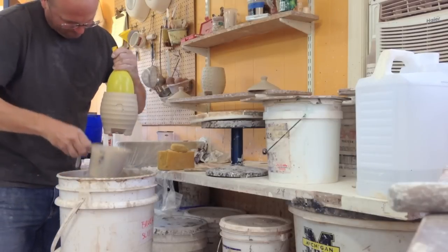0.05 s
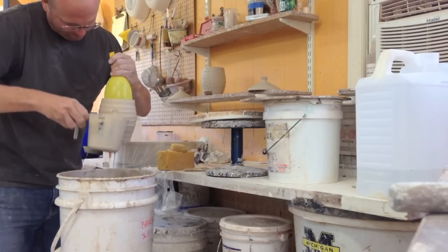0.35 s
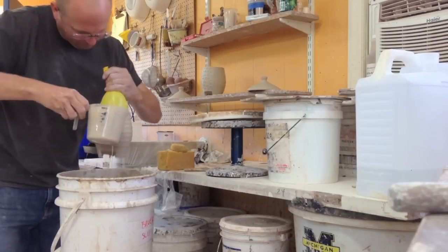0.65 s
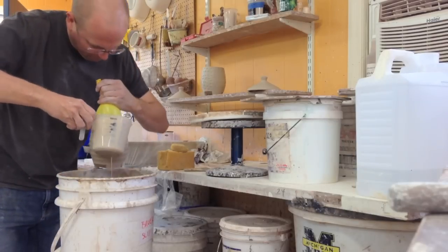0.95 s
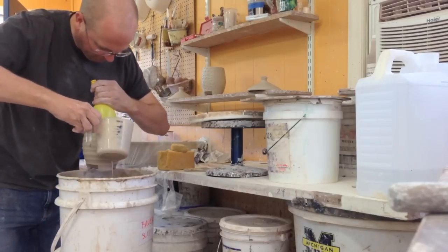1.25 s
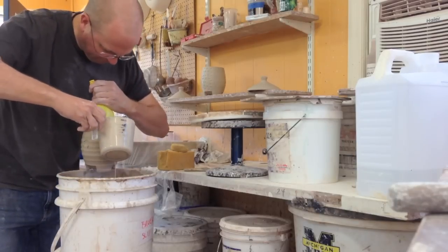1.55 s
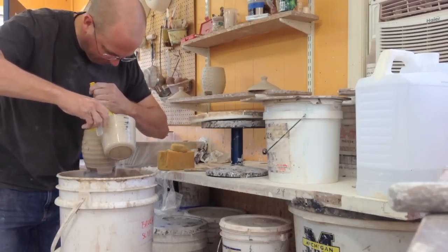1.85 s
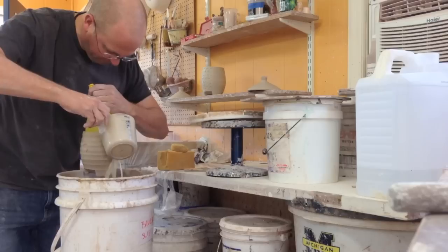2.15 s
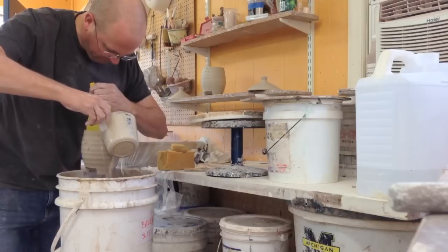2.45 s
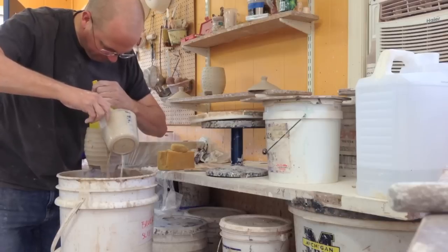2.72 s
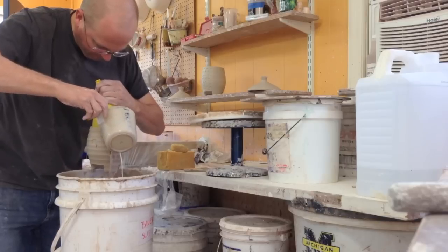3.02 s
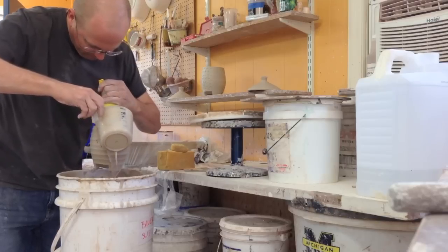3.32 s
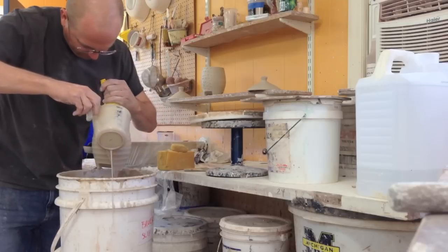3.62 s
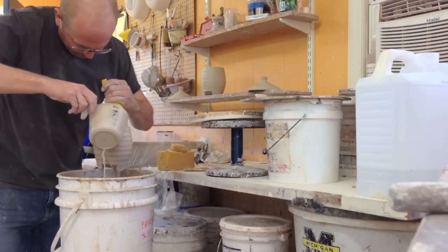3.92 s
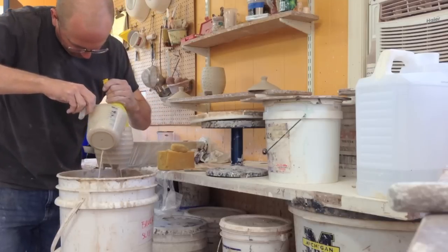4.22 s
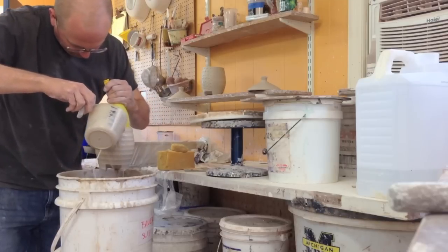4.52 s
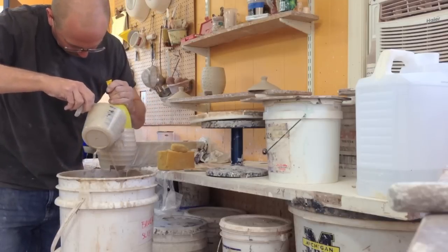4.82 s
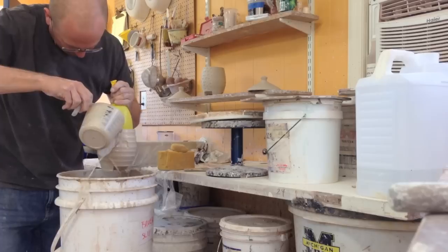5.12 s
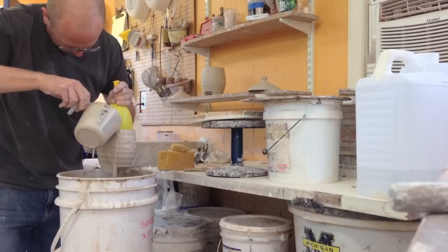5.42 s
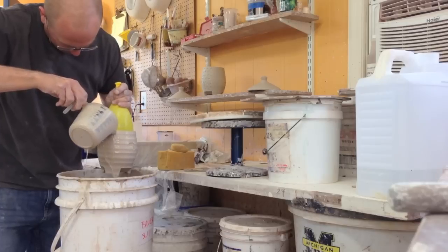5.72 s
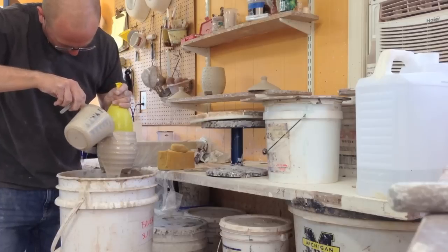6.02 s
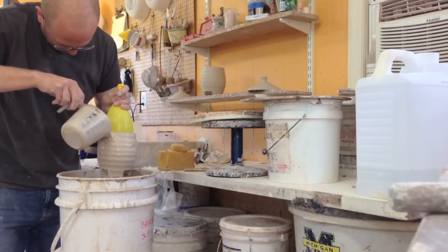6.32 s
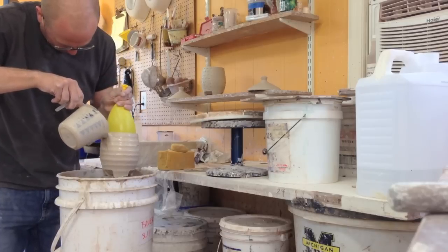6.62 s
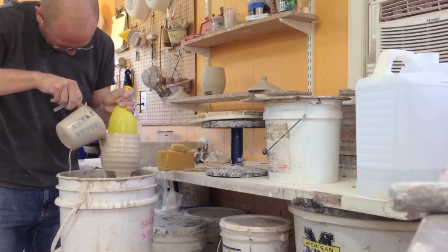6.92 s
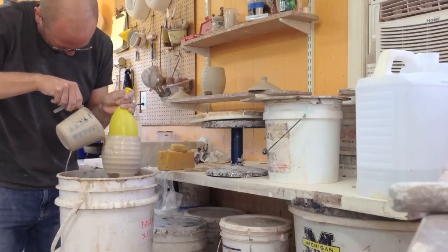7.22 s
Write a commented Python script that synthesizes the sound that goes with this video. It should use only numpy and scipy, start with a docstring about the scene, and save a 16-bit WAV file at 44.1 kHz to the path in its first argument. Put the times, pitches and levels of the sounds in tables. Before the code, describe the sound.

A small wet splash opens the sound, followed by scattered drips and a couple of soft plops as runny clay drains from a jug into a plastic bucket. At about 0.7 seconds there is one soft, dull knock. From around 0.9 seconds a thin, quiet trickle builds, dotted with little pinging drips. At about 2.3 seconds a louder stream begins, thin and high at first, then gaining body by 3 seconds with low gulps, small bubbles and fine spatter. Thick globs plop and splash through it. The pour is continuous but lumpy, easing slightly between 5 and 6 seconds, with a clear plop near 5.7 seconds and a rising gloop near 7.1 seconds. It is still running at the end, around 7.5 seconds. The liquid rings hollowly inside the bucket, and everything has a short small-workshop echo over a faint, steady hiss.

```python
"""Clay slip (runny clay) is scooped from a plastic bucket with a jug and poured over a pot held above it.
First the jug drains and drips, and there is one dull knock. A thin trickle follows, and from about
2.3 seconds a thick stream runs off the pot: trapped air rings as low gulps, small bubbles and fine
spatter, while globs plop and splash. Every pop rattles round the bucket, rings the air inside it and
fades in a small workshop, over a faint hiss."""
import sys
import numpy as np
from scipy import signal
from scipy.fft import rfft, irfft
from scipy.io import wavfile
from scipy.ndimage import uniform_filter1d

SR = 44100
rng = np.random.default_rng(int(sys.argv[2]) if len(sys.argv) > 2 else 0)


def file_out(sig):
    """Save sig as 16-bit WAV at sys.argv[1]."""
    # one column per channel
    cols = np.atleast_2d(sig).T
    # limit, then scale
    lim = np.clip(cols, -1, 1)
    pcm = np.round(lim * 32767).astype(np.int16)
    wavfile.write(sys.argv[1], SR, pcm)


N = 328986

# Thick globs that land in the bucket. Each row: start in seconds, pitch in Hz, relative plop level in dB,
# rough ring length in cycles, relative level of the churning in dB, its fade time in seconds.
GLOBS = [(.354, 610, -56, 9.7, -57.5, 0.1), (2.677, 630, -47, 5.6, -72, .05),
         (2.815, 496, -50, 26, -70, .14), (2.897, 563, -49.5, 15, -68, .08),
         (2.932, 573, -53.5, 8.4, -66, .04), (3.063, 545, -42.5, 9.8, -45, 0.12),
         (3.213, 354, -49.5, 7.9, -63, .06), (3.255, 320, -49, 7.8, -52.5, .13),
         (3.29, 252, -56.5, 6.8, -62, .05), (3.344, 330, -50.5, 4.9, -57, .15),
         (3.479, 304, -49, 6.8, -58, .3), (3.505, 696, -49, 7.3, -58, .3),
         (3.775, 376, -52.5, 8.2, -56, .038), (3.975, 434, -43.5, 3.4, -63, 0.049),
         (4.002, 800, -49, 3.2, -62, .05), (4.239, 375, -53, 5.3, -45.5, 0.12),
         (4.285, 252, -57.5, 7.3, -65, .05), (4.637, 414, -54, 8.8, -42.5, 0.068),
         (4.678, 421, -51.5, 13, -63, 0.18), (4.774, 707, -50, 8.3, -60, .06),
         (4.851, 410, -50, 2.8, -43, 0.047), (5.199, 370, -53.5, 4.6, -56, .25),
         (5.668, 710, -56, 11, -65, .04), (5.714, 810, -39, 9.3, -52, .12),
         (5.732, 840, -42.5, 4.5, -60, .1), (5.872, 705, -51.5, 3.6, -53, .03),
         (6.145, 406, -43, 3, -66, .12), (6.155, 270, -55, 4.3, -66, .05), (6.648, 770, -51, 19, -62, .1),
         (6.685, 420, -60, 10, -55, 0.13), (6.745, 424, -56.5, 7.4, -52, .1),
         (6.846, 740, -52, 13, -47, 0.03), (7.016, 770, -49.5, 11, -49, 0.1),
         (7.104, 782, -42, 9, -63, .04), (7.16, 530, -53, 8.5, -65, .05), (7.305, 467, -61, 6, -66, .06)]


def stream():
    """Falling slip folds air under, froths and throws spatter; globs churn it and splashes stir it up."""
    # Air folded under as low gulps. Each row: time in seconds, relative level in dB.
    folded_air = [(2.4, -70), (2.65, -61), (2.9, -50), (3.3, -50), (3.7, -49), (3.94, -59), (4.2, -49),
                  (4.4, -47.5), (4.6, -58.5), (4.75, -51.5), (5.0, -56), (5.4, -51.5), (5.63, -58),
                  (5.85, -50), (6.4, -57), (6.5, -52.5), (6.8, -52.5), (7.46, -52.5)]
    # Strength of the stream. Each row: time in seconds, relative levels of froth and of spatter in dB.
    flow = [(2.4, -45, -60.5), (2.51, -47.5, -58), (2.55, -48.5, -61), (2.86, -48, -55), (3.19, -52.5, -60),
            (3.39, -51, -61), (4.27, -49.5, -57.5), (4.44, -49, -57.5), (4.92, -53.5, -62),
            (5.08, -53, -63.5), (5.29, -57, -65), (5.5, -54.5, -58), (5.9, -56.5, -62), (5.99, -55, -64),
            (6.53, -53, -57.5), (6.7, -53, -58.5), (7.05, -51.5, -59.5), (7.46, -48.5, -56)]
    # The stream nearly breaks. Each row: time in seconds, half the length in seconds, level change in dB.
    stalls = [(3.923, 0.03, -2), (4.153, 0.038, -4.5), (5.19, 0.037, -5), (5.56, 0.044, -3.5),
              (5.95, 0.035, -5)]
    # Wet splashes. Each row: start in seconds, relative level in dB, fade time in seconds.
    splashes = [(0, -44.5, 0.042), (.35, -60, 0.11), (2.645, -49, 0.084), (2.865, -42.5, 0.033),
                (4.255, -41, .018), (4.49, -43.5, 0.031), (4.76, -47, 0.023), (5.026, -47, 0.058),
                (5.243, -51, 0.14), (5.345, -45.5, .021), (5.65, -48.5, 0.2), (5.997, -47.5, 0.066),
                (6.19, -44.5, 0.047), (6.325, -51, .074), (6.63, -43, 0.079), (6.705, -45, 0.059),
                (7.209, -51, .03), (7.31, -49, .03)]

    gulps = swarm(108.8, 1445, per_s=220, cycles=17, spread_db=8, rise=.028, scatter=.68)
    bubbles = swarm(1430, 5450, per_s=700, cycles=12.5, spread_db=17.5, rise=.018, scatter=.9)
    spatter = swarm(5440, 13800, per_s=800, cycles=10.2, spread_db=16.5, rise=.047, scatter=.9)

    # The curves below set how loud those three layers are at each moment.
    pour_start_s = 2.338
    stalling = undb(sum(db * bump(s, half_s) for s, half_s, db in stalls))
    running = stalling * ramp(pour_start_s, length_s=.09)
    running *= lumps(per_s=22, decay_s=.022, spread_db=12, steady=.9)
    folding = running * undb(curve(folded_air, column=1))
    # The froth builds slowly, so the stream starts thin and high, then gains body.
    froth = running * undb(curve(flow, column=1)) * ramp(pour_start_s, length_s=.35)
    spray = running * undb(curve(flow, column=2))
    trickle = ramp(start_s=.91, length_s=1) * lumps(per_s=12, decay_s=.043, spread_db=12, steady=.21)
    churn = surges([(s, db, decay_s) for s, _, _, _, db, decay_s in GLOBS])
    splash = surges(splashes)
    return (gulps * combine((folding, -8), (churn, -7), (splash, -14), (trickle, -77))
            + bubbles * combine((froth, -2), (splash, -3.5), (trickle, -73))
            + spatter * combine((spray, 4.5), (splash, -6), (trickle, -73)))


def swarm(low_hz, high_hz, per_s, cycles, spread_db, rise, scatter, spot_count=16):
    """Many bubbles burst at several spots where the stream lands; the average level is 1."""
    # Tone of the stream. Each row: frequency in Hz, boost or cut in dB.
    stream_tone = [(40, -28), (90, -10), (170, -12), (290, -5.5), (500, 1.5), (900, 1), (1400, -4),
                   (1950, -5.5), (2500, -5), (3500, -2), (4700, 0), (5600, -12), (7300, -14.5),
                   (9000, -19.5), (12000, -25), (15000, -22)]
    spots = np.zeros((spot_count, N))
    # Each lump of slip favours one bubble size; a scatter of 1 spreads sizes over the whole range.
    favoured = wander(per_s=16)
    for k, (when, up, down, force) in enumerate(rng.random((int(per_s * N / SR), 4))):
        smallness = (favoured[int(when * N)] / 2 + scatter * (up - down)) % 1
        hz = low_hz * (high_hz / low_hz) ** smallness
        # Small bubbles die sooner, so they are given a higher peak.
        peak = hz * undb(spread_db * force ** 2)
        add(spots[k % spot_count], when * N / SR, bubble(hz, cycles, rise) * peak)
    bounced = sum(walls(spot)[:N] for spot in spots)
    return unit(colour(bounced, stream_tone))


def bubble(hz, cycles, rise):
    """A pocket of air rings briefly in the thick slip, its pitch rising as it comes to the surface."""
    life_s = max(cycles, .5) / (np.pi * hz)
    age = np.arange(int(6 * life_s * SR) + 4) / (life_s * SR)
    pitch = np.minimum(hz * (1 + rise * (age - .5)), SR / 2)
    swell = 1 - np.exp(-age / .25)
    size = np.sin(2 * np.pi * np.cumsum(pitch) / SR) * np.exp(-age) * swell
    # It is the change in size that pushes the air, so there is little sound below the note.
    return np.diff(size, prepend=0) * SR / (2 * np.pi * hz)


def lumps(per_s, decay_s, spread_db, steady):
    """A loudness curve for slip falling unevenly: small lumps, loosely spaced, on a steady thread."""
    lateness, size = rng.random((int(per_s * N / SR), 2)).T
    hits = np.zeros(N)
    for k in range(len(size)):
        add(hits, (k + lateness[k]) / per_s, undb([spread_db * (size[k] - 1)]))
    fading_hits = signal.lfilter([1], [1, -np.exp(-1 / (decay_s * SR))], hits)
    return unit(steady + fading_hits)


def pops():
    """Single drips and bursting bubbles stand out, each with a short ping."""
    # Each row: start in seconds, pitch in Hz, relative level in dB, rough ring length in cycles.
    drips = [(.027, 4050, -52.5, 7.6), (0.117, 4030, -55.5, 2.3), (.268, 6400, -58.5, 7),
             (0.286, 4970, -55.5, 2.5), (0.358, 6660, -55.5, 2.6), (.374, 7360, -57, 6),
             (.415, 1600, -48.5, 14), (.467, 6900, -60, 4), (0.517, 3680, -61, 3.5), (.622, 4520, -63, 9.1),
             (0.86, 9200, -62.5, 7), (0.862, 4000, -62, 7.4), (.94, 2900, -66.5, 5.1),
             (.947, 910, -63, 9.1), (1.084, 1860, -57.5, 18), (1.085, 3320, -61, 0.73),
             (1.106, 2040, -69, 12), (1.199, 5760, -59.5, 6), (1.225, 6220, -61, 6),
             (1.307, 1120, -60.5, 27), (1.309, 6440, -55.5, 4.7), (1.346, 2220, -68, 60),
             (1.366, 6000, -56.5, 12), (1.443, 1705, -54, 21), (1.446, 2190, -61, 30),
             (1.483, 10240, -54, 17), (1.6, 1530, -58.5, 9.2), (1.612, 1850, -62, 73),
             (1.631, 6900, -54, 7.9), (1.7, 2210, -69, 11), (1.804, 2500, -62, 5.8),
             (1.809, 1480, -56, 8.1), (1.85, 6200, -59.5, 3.7), (1.869, 1143, -60, 35),
             (2.009, 5000, -49, 2.2), (2.033, 4540, -55.5, 4.3), (2.083, 1157, -53.5, 19),
             (2.125, 2190, -66, 30), (2.121, 7200, -53, 6.2), (2.328, 6560, -49, 4.3),
             (2.351, 2430, -48.5, 8.1), (2.35, 3350, -42, 3.5), (2.417, 1400, -62.5, 1.9),
             (2.442, 4300, -49, 3.6), (2.465, 7200, -49, 3.3), (2.491, 2420, -53, 22),
             (2.493, 1240, -59.5, 4.2), (2.55, 2190, -58, 82), (2.565, 6950, -45.5, 4.2),
             (2.582, 5130, -46, 13), (2.592, 1190, -56, 7.4), (2.602, 4200, -42.5, 2.2),
             (2.646, 4400, -43, 4.8), (2.678, 3050, -41.5, 2.7), (2.697, 3000, -41, 2.3),
             (2.803, 2700, -39, 5.1), (2.837, 2800, -42.5, 2.5), (2.872, 4600, -41.5, 3.8),
             (2.875, 1080, -56, 18), (2.898, 4440, -45, 3.5), (2.9, 1720, -50, 7.5),
             (2.944, 8200, -42.5, 5.2), (2.979, 4750, -44.5, 5.9), (3.002, 2650, -41.5, 4.3),
             (3.003, 4730, -40.5, 9.7), (3.094, 2550, -45.5, 6.7), (3.096, 1130, -50.5, 6),
             (3.135, 4550, -44, 6.7), (3.169, 2330, -39.5, 6), (3.174, 1000, -52, 4),
             (3.19, 2250, -44.5, 7.9), (3.277, 1670, -49.5, 32), (3.279, 1010, -49.5, 4),
             (3.289, 7340, -47, 17), (3.394, 2580, -41, 3.4), (3.451, 3530, -47, 0.8),
             (3.509, 3800, -56, 2.3), (3.573, 4670, -51, 8), (3.639, 3920, -43.5, 7), (3.66, 4000, -45, 10),
             (3.748, 4150, -42.5, 16), (3.831, 8560, -51, 7.7), (3.957, 2440, -44, 9.6),
             (4.041, 440, -60, 13), (4.178, 6200, -41.5, 11), (4.233, 1370, -42, 3),
             (4.254, 8600, -47.5, 6), (4.27, 1470, -45.5, 5.4), (4.324, 1090, -45, 2.8),
             (4.389, 3080, -48, 2.5), (4.481, 806, -50.5, 9.2), (4.584, 4140, -39, 9),
             (4.637, 1040, -45.5, 1.9), (4.72, 433, -58, 15), (4.827, 4140, -47.5, 3),
             (4.884, 2940, -45.5, 13), (4.886, 956, -55.5, 11), (4.899, 434, -61, 15),
             (4.95, 3580, -44.5, 2.2), (5.025, 1010, -49.5, 2.4), (5.026, 4100, -49, 2.7),
             (5.107, 4270, -48, 7), (5.199, 1230, -53, 5.4), (5.243, 815, -58.5, 37),
             (5.244, 10300, -54, 6), (5.269, 1520, -50, 16), (5.356, 6000, -47.5, 14),
             (5.415, 4150, -42, 11), (5.616, 3330, -43, 4.2), (5.65, 3100, -38, 4.3), (5.709, 2280, -42, 7),
             (5.717, 3640, -40, 2.9), (5.785, 3920, -44, 7), (5.839, 1476, -51, 15), (5.925, 4370, -44, 5),
             (6.006, 1440, -53.5, 55), (6.019, 3330, -47.5, 20), (6.172, 1690, -50.5, 26),
             (6.189, 760, -49.5, 11), (6.203, 436, -54, 13), (6.335, 360, -56.5, 30),
             (6.507, 2380, -43.5, 7.5), (6.654, 1255, -52.5, 12), (6.722, 4200, -43, 4.2),
             (6.877, 6500, -48, 8.4), (6.938, 4360, -48, 5), (7.11, 1120, -43.5, 6.8),
             (7.208, 2340, -48.5, 2), (7.308, 4260, -44, 3.6), (7.345, 1950, -49.5, 6.6)]
    out = np.zeros(N)
    for s, hz, db, cycles in drips:
        pop = burst(hz, .99 * cycles, rise=.0092, snap_db=-24, band_ratio=2.03, direct=.42)
        add(out, s, pop * undb(db - 1))
    return out


def globs():
    """Each thick glob lands with a low plop."""
    out = np.zeros(N)
    for s, hz, db, cycles, _, _ in GLOBS:
        plop = burst(hz, .94 * cycles, rise=.023, snap_db=-11, band_ratio=2.3, direct=.78)
        add(out, s, plop * undb(db - 1))
    return out


def burst(hz, cycles, rise, snap_db, band_ratio, direct, late_db=-7):
    """A quick snap and the ring of its bubble; the loudest moment has level 1."""
    ping = walls(bubble(hz, cycles, rise), bounce_s=.009, direct=direct, late_db=late_db)
    snap = bubble(min(1.4 * hz, SR / 4), cycles=1, rise=0)
    snap = walls(snap, bounce_s=.006, direct=direct, late_db=late_db)
    # The snap is 1 dB softer each time the ring length doubles.
    hardness = undb(snap_db - np.log2(max(cycles, 1) / 3.1))
    add(ping, 0, snap * np.abs(ping).max() / np.abs(snap).max() * hardness)
    # The thick slip softens each burst, so it stays near its own note.
    band_hz = [hz / band_ratio, min(hz * band_ratio, SR / 2 - 1000)]
    ping = signal.sosfilt(signal.butter(2, band_hz, "bandpass", fs=SR, output="sos"), ping)
    power = uniform_filter1d(ping ** 2, size=440, mode="constant")
    return ping / np.sqrt(power.max())


def gloops():
    """Fat air pockets come to the surface one by one."""
    # Each row: start in seconds, pitch in Hz, level in dB, seconds held, seconds sweeping up,
    # amount of flutter from 0 to 1.
    air_pockets = [(.221, 758, -50.5, .031, 0.024, 0.15), (7.099, 723, -46, 0.0043, 0.0239, 0.5)]
    out = np.zeros(N)
    for s, hz, db, held_s, sweep_s, flutter in air_pockets:
        add(out, s, gloop(hz, held_s, sweep_s, flutter) * undb(db))
    return out


def gloop(hz, held_s, sweep_s, flutter, edge_s=.0016, wobble=.04, fade_db=-2.5, echo_db=-9):
    """A big bubble holds a wobbly note, then slides up an octave as it opens; its thick skin flutters."""
    t = np.arange(int((held_s + sweep_s) * SR)) / SR
    opening = np.clip((t - held_s) / sweep_s, 0, 1)
    edges = np.clip(np.minimum(t, t[-1] - t) / edge_s, 0, 1)
    pitch = hz * 2 ** opening * (1 + wobble * wander(per_s=308)[:len(t)])
    skin = 1 + flutter * wander(per_s=600)[:len(t)]
    note = np.sin(2 * np.pi * np.cumsum(pitch) / SR) * edges * skin * undb(fade_db * opening)
    out = undb(echo_db) * signal.fftconvolve(note, tail(length_s=.08))
    add(out, 0, note)
    return out


def walls(x, bounce_s=.012, direct=.38, onset_s=.00055, late_db=-5.5):
    """Sound bounces between the bucket walls and leaks away; each spot has its own pattern of echoes."""
    t = np.arange(int(3 * bounce_s * SR)) / SR
    early = rng.standard_normal(len(t)) * (1 - np.exp(-t / onset_s)) * np.exp(-(t / bounce_s) ** 2 / 2)
    echoes = undb(late_db) * tail(length_s=.34)
    add(echoes, 0, unit(early) / np.sqrt(len(t)))
    echoes[0] += direct  # the part that comes straight past the rim
    return signal.oaconvolve(x, echoes)


def bucket(x, drift=.004, ring_db=-1):
    """The air in the bucket rings at its own notes, which drift as pot and jug move over its mouth."""
    # Each row: pitch in Hz, width in Hz (narrow notes ring longer), relative level in dB.
    air_notes = [(295, 50, -1), (433, 24, 6.5), (545, 55, -7), (801, 26, 6), (1030, 70, -1), (1150, 20, -7),
                 (1264, 20, 2), (1722, 26, 5.5), (2163, 24, 3.5), (2283, 34, 1), (2729, 20, 2),
                 (3101, 36, -1), (3400, 140, -3), (4100, 1200, -17)]
    drifting_time = np.cumsum(1 + drift * wander(per_s=5)) / SR
    rings = 0
    for hz, width, db in air_notes:
        # Shift the note down to 0 Hz, smooth it so that it lingers, then shift it back.
        spin = np.exp(2j * np.pi * hz * drifting_time)
        decay = np.exp(-np.pi * width / SR)
        lingering = signal.lfilter([1 - decay], [1, -decay], x * spin.conj())
        rings += undb(db) * 2 * (spin * lingering).real
    return x + undb(ring_db) * rings


def knock(start_s=.697):
    """A dull knock, probably jug against pot; it is above the bucket, so it has little ring."""
    # Each row: pitch in Hz, level in dB, ring length in cycles.
    knock_notes = [(325, -51.5, 3.7), (485, -50.5, 5.4), (940, -48, 1.1)]
    out = np.zeros(N)
    for hz, db, cycles in knock_notes:
        note = burst(hz, cycles, rise=0, snap_db=-16, band_ratio=2.5, direct=.45, late_db=-17)
        add(out, start_s, note * undb(db))
    return out


def workshop(x, echo_db=-7, delay_s=.018):
    """The cluttered room adds a short echo with softer treble."""
    echo = np.zeros(N)
    add(echo, delay_s, signal.fftconvolve(x, tail(length_s=.41))[:N])
    return x + undb(echo_db) * colour(echo, [(250, 1.5), (1500, 2), (6000, -.5), (14000, -7)])


def hiss(level_db=-65):
    """A faint, steady hiss fills the workshop."""
    # Each row: frequency in Hz, boost or cut in dB.
    hiss_tone = [(15, -40), (25, -16.5), (69, -3.5), (140, -2.5), (224, -3), (286, .5), (363, -6.5),
                 (709, -4.5), (1350, -13), (1810, -9.5), (4260, -12.5), (15000, -15)]
    return unit(colour(rng.standard_normal(N), hiss_tone)) * undb(level_db)


def tail(length_s):
    """A dense wash of echoes that fades by 60 dB over its length."""
    t = np.arange(int(length_s * SR) + 2) / SR
    echoes = rng.standard_normal(len(t)) * np.exp(-np.log(1000) * t / length_s)
    return echoes / np.sqrt(np.sum(echoes ** 2))


def surges(rows, attack_s=.0012):
    """A loudness curve made of swells that rise quickly and die away."""
    t, power = np.arange(N) / SR, np.zeros(N)
    for s, db, decay_s in rows:
        age = np.maximum(t - s, 0)
        power += (undb(db) * np.minimum(age / attack_s, 1) * np.exp(-age / decay_s)) ** 2
    return np.sqrt(power)


def combine(*causes):
    """Add up the power of separate causes, each a loudness curve with a gain in dB."""
    return np.sqrt(sum((loudness * undb(db)) ** 2 for loudness, db in causes))


def ramp(start_s, length_s):
    """Rise from 0 to 1 and stay there."""
    return np.clip((np.arange(N) / SR - start_s) / length_s, 0, 1)


def bump(s, half_s):
    """A smooth bump of height 1 around a moment."""
    return np.exp(-np.minimum(((np.arange(N) / SR - s) / half_s) ** 2, 20))


def wander(per_s):
    """Glide between random values, per_s of them each second."""
    points = rng.standard_normal(int(per_s * N / SR) + 2)
    return np.interp(np.arange(N) * per_s / SR, np.arange(len(points)), points)


def curve(table, column):
    """Join one column of a table with straight lines over time."""
    rows = np.array(table)
    return np.interp(np.arange(N) / SR, rows[:, 0], rows[:, column])


def colour(x, points):
    """Shape the tone of a sound; each point is a frequency in Hz and a boost or cut in dB."""
    hz, db = np.transpose(points)
    freqs = np.maximum(np.arange(N // 2 + 1) * SR / N, 1)
    gain = undb(np.interp(np.log(freqs), np.log(hz), db))
    return irfft(rfft(x) * gain, N)


def add(out, s, sound):
    """Mix a sound in, starting at s seconds."""
    i = max(int(s * SR), 0)
    out[i:i + len(sound)] += sound[:max(N - i, 0)]


def undb(db):
    """Turn decibels into a number to multiply by."""
    return 10 ** (np.asarray(db) / 20)


def unit(x):
    """Scale to an average (rms) level of 1."""
    return x / np.sqrt(np.mean(x ** 2) + 1e-20)


def scene():
    """Drips and stream in the bucket and a knock above it, all in the room."""
    liquid = pops() + globs() + gloops() + stream()
    return (workshop(bucket(liquid) + knock()) + hiss())[None]


def record(dry, top_hz=15250):
    """Cut off the very highest treble."""
    return signal.sosfilt(signal.ellip(12, .1, 70, top_hz, fs=SR, output="sos"), dry)


dry = scene()
out = record(dry)
file_out(out)
```